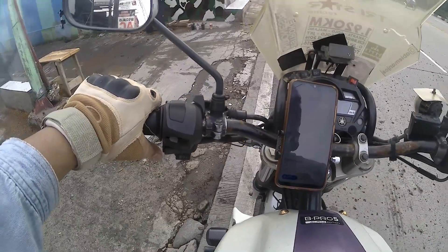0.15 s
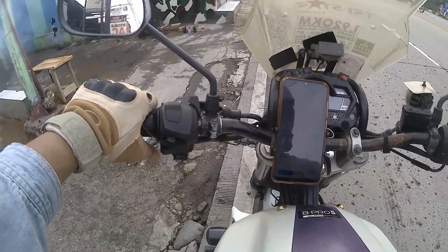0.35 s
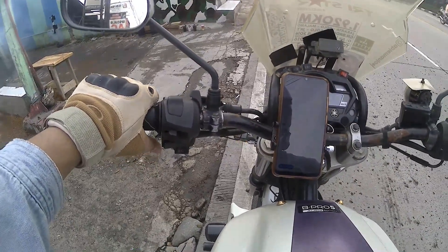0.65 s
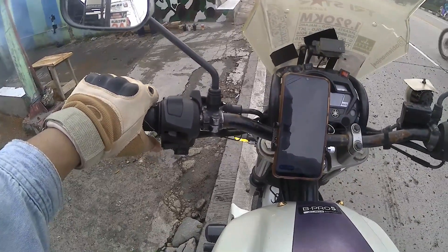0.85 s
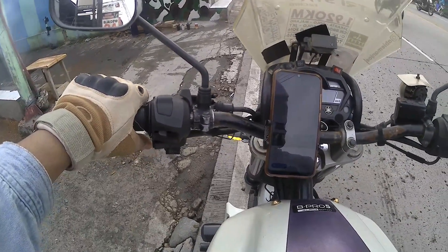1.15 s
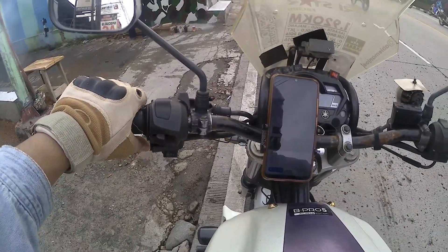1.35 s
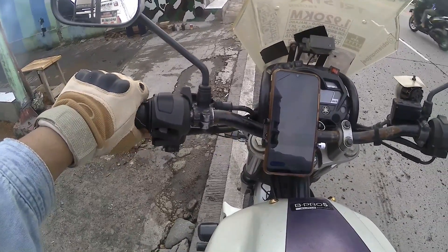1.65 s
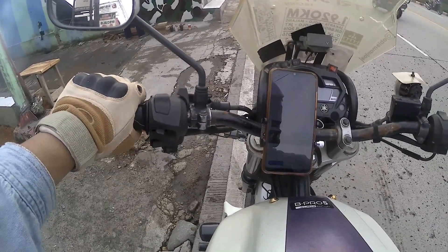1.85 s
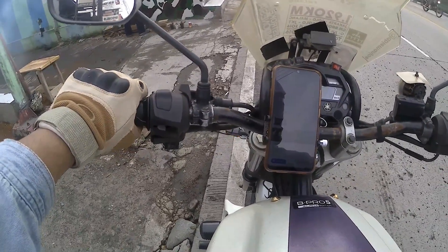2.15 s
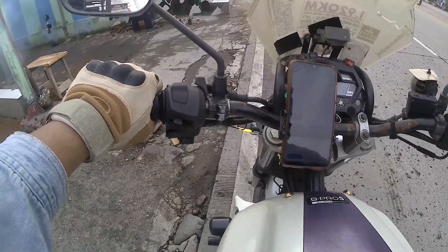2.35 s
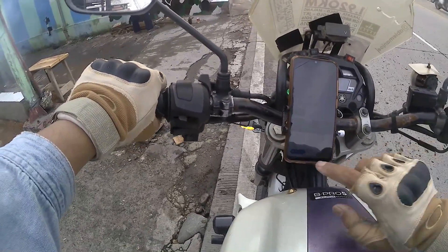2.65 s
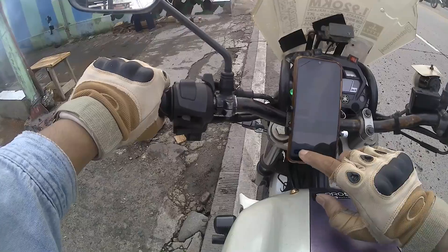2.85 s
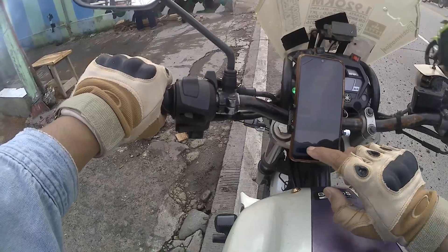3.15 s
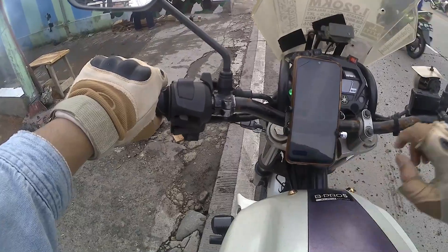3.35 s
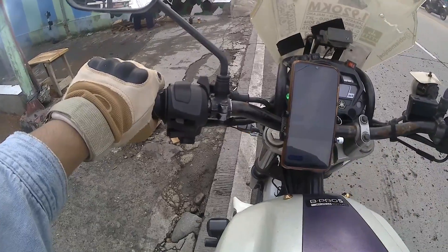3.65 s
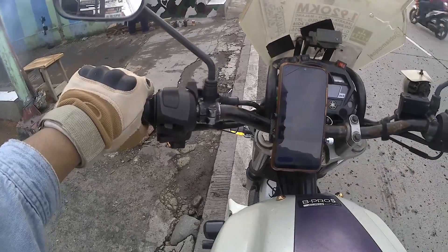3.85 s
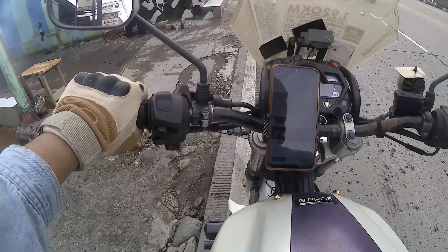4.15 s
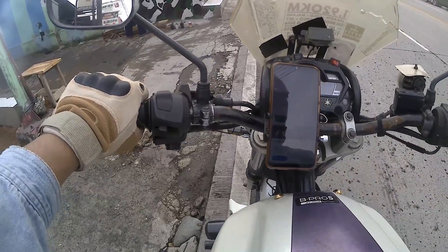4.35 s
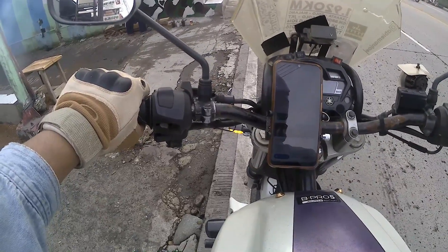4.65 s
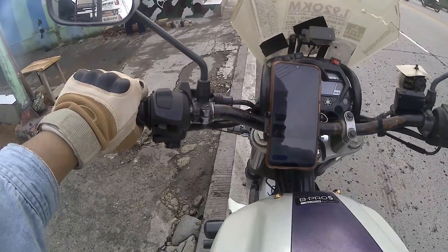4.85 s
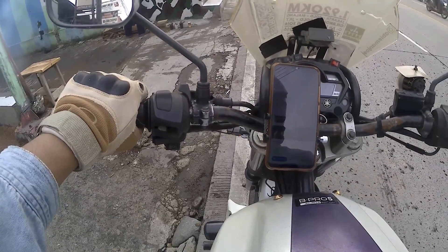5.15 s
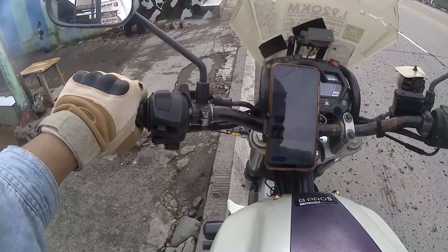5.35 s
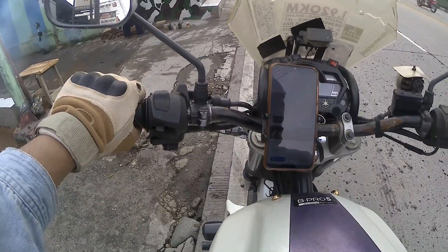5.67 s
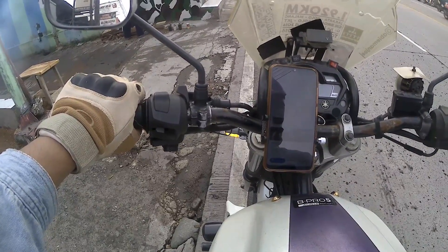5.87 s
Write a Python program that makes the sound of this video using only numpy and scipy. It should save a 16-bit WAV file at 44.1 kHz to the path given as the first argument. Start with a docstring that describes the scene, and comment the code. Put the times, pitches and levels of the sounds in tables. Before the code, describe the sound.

Heard from the seat, a stationary motorcycle idles and revs a couple of times as other motorbikes go by over tyre hiss and rumble.

```python
"""A single-cylinder motorcycle thumps and clatters at the roadside, right under a microphone at the
rider's seat. Twice the throttle opens and the airbox honks; the revs rise again at the end.
Out in the street, over tyre hiss and rumble, three bikes pass: one gathers speed with a hard putter,
one cruises with a steady boom, and a later one whines by and coasts off, its exhaust orders sinking.
The microphone feeds a narrow-band 8 kHz link."""
import sys
import numpy as np
from scipy import signal
from scipy.io import wavfile
from scipy.ndimage import map_coordinates

SR = 44100
rng = np.random.default_rng(int(sys.argv[2]) if len(sys.argv) > 2 else 0)


def log_audio(samples):
    """Write samples as a 16-bit WAV file to the path given in sys.argv[1]."""
    # one column per channel
    frames = np.atleast_2d(samples).T
    # limit to full scale, then quantise
    limited = np.clip(frames, -1, 1)
    pcm = np.round(limited * 32767).astype(np.int16)
    wavfile.write(sys.argv[1], SR, pcm)


N = 264996
TIME = np.arange(N) / SR
LINK_HZ = 8000

# street rumble: (frequency [Hz], relative level [dB])
RUMBLE_SPECTRUM = [(15, -36), (28, -17.5), (45, 6), (70, 3), (120, 3.5), (200, -2.5), (350, -10),
                   (700, -24.5), (2000, -40.5)]
# tyres on the road: (frequency [Hz], relative level [dB])
TYRE_SPECTRUM = [(200, 3), (450, 3), (700, -2.5), (950, -3), (1400, -10.5), (1900, -11.5), (2600, -17.5),
                 (3300, -22), (3900, -23)]
# brief flares of the hiss: (time [s], relative level [dB])
HISS_FLARES = [(.22, -23.5), (.74, -28), (2.14, -23.5), (2.62, -33)]

# an exhaust barking under load: (frequency [Hz], relative level [dB])
BARK_SPECTRUM = [(60, -25), (120, -1.5), (270, 2), (360, -4), (430, -8), (500, -4), (650, -5), (850, -12.5),
                 (1150, -17.5), (1600, -31), (2400, -46.5), (3600, -54.5)]
# the bark and its bounces off road and bodywork: (delay [s], relative level [dB])
BARK_PATHS = [(0, -1.5), (.0037, -14.5), (.0071, -23.5), (0.0118, -9)]
# engine speed of the pulling bike: (time [s], firing rate [1/s])
PULLING_SPEED = [(0, 22.7), (2, 27.74), (3, 28.5)]

# engine speed of the cruising bike: (time [s], firing rate [1/s])
CRUISING_SPEED = [(0, 45.2), (.25, 47), (.45, 47.7), (.7, 47.6), (1, 47.35), (1.4, 47.5), (2.5, 47.4)]
# its exhaust booming under load: (frequency [Hz], relative level [dB])
BOOM_SPECTRUM = [(25, -51), (48, -12), (95, -1), (143, -1.5), (190, -4.5), (238, -6.5), (300, -15),
                 (430, -16), (550, -35), (1000, -54), (3000, -75)]
# its tailpipe from behind: (frequency [Hz], relative level [dB])
TAILPIPE_SPECTRUM = [(100, -14), (150, -7), (190, 4.5), (238, 1), (285, -3.5), (335, -5.5), (380, 1),
                     (428, 4), (475, -1.5), (525, -10.5), (700, -16), (1500, -35), (3500, -61)]

# engine speed of the coasting bike: (time [s], firing rate [1/s])
COASTING_SPEED = [(2.3, 51.5), (2.7, 52.9), (2.95, 54.7), (3.28, 56.4), (3.4, 53.4), (3.52, 49.4),
                  (3.58, 48.6), (3.68, 43.4), (3.87, 43.3), (4.05, 42.3), (4.28, 41.5), (4.42, 38.4),
                  (4.52, 37.2), (4.68, 38.3), (4.95, 37.8), (6, 38.5)]
# four resonances that pick out its orders, low to high: (time [s], frequency [Hz], peak level [dB])
PIPE_RESONANCE = [(2.4, 160, -42), (3.27, 165, -36), (3.4, 160, -20), (3.55, 193, -23), (3.68, 172, -29),
                  (3.88, 173, -25), (4.25, 166, -27), (4.42, 154, -19), (4.54, 150, -17.5),
                  (4.63, 152, -12), (4.8, 152, -29), (5.05, 152, -21), (5.2, 152, -36), (6, 152, -44)]
GROWL_RESONANCE = [(2.3, 465, -41), (2.85, 485, -31), (3.05, 440, -29), (3.25, 395, -25.5), (3.4, 373, -28),
                   (3.54, 343, -26), (3.68, 310, -55)]
SNARL_RESONANCE = [(2.6, 540, -55), (3, 548, -35), (3.25, 505, -28), (3.45, 480, -38), (3.72, 433, -31),
                   (3.87, 390, -27), (4.03, 347, -30.5), (4.26, 336, -30), (4.5, 310, -44), (6, 305, -60)]
BUZZ_RESONANCE = [(3.2, 610, -65), (3.38, 590, -36), (3.53, 543, -30), (3.63, 510, -38), (3.74, 477, -31),
                  (3.92, 470, -65)]
# gas rasping in its muffler: (frequency [Hz], relative level [dB])
MUFFLER_SPECTRUM = [(50, -19.5), (120, -11), (210, 2.5), (290, -3), (390, 1.5), (510, -7.5), (650, -19.5),
                    (900, -17.5), (1400, -34), (3500, -37)]
# its high orders, singing while it pulls: (frequency [Hz], relative level [dB])
SINGING_SPECTRUM = [(700, -27), (810, -7), (890, 0.5), (970, -9), (1045, -11), (1110, -10.5), (1180, -11.5),
                    (1265, -7.5), (1400, -28)]
# its thin whine, which climbs and twice steps back down: (time [s], frequency [Hz])
WHINE_PITCH = [(2.1, 1021), (2.4, 1034), (2.7, 1059), (2.73, 1018), (2.81, 1018), (2.95, 1041),
               (3.05, 1043), (3.08, 996), (3.25, 1012), (3.55, 1009)]
# brief spurts of that whine: (time [s], level [dB])
WHINE_SPURTS = [(2.04, -37.5), (2.27, -38), (2.79, -29), (2.89, -40), (3.24, -35.5), (3.34, -40),
                (3.5, -40)]

# engine speed of the rider's own bike: (time [s], firing rate [1/s])
OWN_SPEED = [(0, 9.28), (0.28, 10.03), (.72, 15.64), (.95, 15.99), (1.39, 9.44), (2.02, 24.58),
             (2.33, 23.41), (2.98, 13.92), (3.65, 8.64), (4.8, 9.93), (5.68, 12.41), (6.01, 17.74)]
# weight of its exhaust: (time [s], relative level [dB])
THUMP_LEVEL = [(.45, 1.5), (1.25, -2), (1.6, 0), (2.15, -11), (2.28, 1), (2.9, -6.5), (4.4, -2),
               (5.4, -2.7), (5.9, 2.2)]
# its exhaust ringing on at high revs: (frequency [Hz], relative level [dB])
RING_SPECTRUM = [(50, -30.5), (78, -7.5), (94, -3.5), (108, -4.5), (150, -21), (300, -56)]
# its throttle held open: (opening time [s], shutting time [s], honk level over idle [dB])
THROTTLE_OPENINGS = [(.62, 1.006, 11.5), (1.457, 2.085, 12.5)]
# one gulp through its airbox: (frequency [Hz], relative level [dB])
AIRBOX_SPECTRUM = [(60, -20), (95, -12.5), (122, 25.5), (150, 10.5), (220, -25.5), (500, -35)]
# its valve gear clattering: (frequency [Hz], relative level [dB])
CLATTER_SPECTRUM = [(80, -35.5), (170, 15.5), (300, -3), (440, 2.5), (700, -20.5), (1000, -9), (1500, -19),
                    (2200, -25.5), (3500, -38.5)]


def amp(db):
    """Decibels to gain."""
    return 10 ** (np.asarray(db) / 20)


def curves(rows):
    """Each column of a table, joined by straight lines over time."""
    times, *columns = np.transpose(rows)
    return [np.interp(TIME, times, column) for column in columns]


def gain_at(spectrum, hz):
    """The gain of a spectrum at these frequencies."""
    points, db = np.transpose(spectrum)
    return amp(np.interp(np.log(hz + 1), np.log(points), db))


def colour(x, spectrum, size=8192):
    """Rings x through a causal filter of unit energy with this spectrum, cut to the link's band."""
    hz = abs(np.fft.fftfreq(size, 1 / SR))
    gain = gain_at(spectrum, hz) / (1 + (2 * hz / LINK_HZ) ** 20)
    minimum_phase = np.exp(np.conj(signal.hilbert(np.log(gain + 1e-9))))
    ring = np.fft.ifft(minimum_phase).real[:size // 2]
    return signal.oaconvolve(x, ring / np.linalg.norm(ring))[:N]


def wander(per_s):
    """A smooth random drift of rms 1."""
    knots = rng.standard_normal(2000)
    drift = np.interp(TIME * per_s, np.arange(len(knots)), knots)
    return drift / np.sqrt(np.mean(drift ** 2))


def wavering_phase(hz, depth, per_s):
    """Phase in radians of a frequency that wavers by the fraction depth."""
    return 2 * np.pi * np.cumsum(hz * (1 + depth * wander(per_s))) / SR


def swell(at_s, width_s):
    """A bell-shaped rise from 0 to 1 and back."""
    return np.exp(-((TIME - at_s) / width_s) ** 2)


def passing(nearest_s, span_s):
    """Gain on driving past the microphone: one over distance, 3 dB down span_s from the nearest point."""
    return 1 / np.hypot(1, (TIME - nearest_s) / span_s)


def leaving(from_s, db_per_s):
    """Gain of a vehicle dropping out of earshot down the street."""
    return amp(-db_per_s * np.maximum(TIME - from_s, 0))


def strokes(rate, angle, spread_db):
    """One kick of uneven size each time the engine cycle passes this angle (in cycles)."""
    cycle = np.floor(np.cumsum(rate) / SR - angle)
    strength = amp(spread_db * np.clip(rng.standard_normal(N), -2, 2))
    return np.diff(cycle, prepend=cycle[0]) * strength * np.sqrt(SR)


def puffs(kicks, decay_s):
    """Each kick lets off a dying burst of turbulence of the same energy."""
    keep = np.exp(-2 / (decay_s * SR))
    energy = signal.lfilter([1 - keep], [1, -keep], kicks ** 2)
    return np.sqrt(energy) * rng.standard_normal(N)


def road():
    """All around: tyre hiss swells with the traffic and flares; rumble grows as the last bike goes by."""
    tyres = [amp(-32),
             amp(-26.5) * passing(nearest_s=.52, span_s=.43),
             amp(-28.5) * passing(nearest_s=3.27, span_s=.86)]
    rise_s, fade_s = .038, .096
    flares = [amp(db) * np.interp(TIME - s, [0, rise_s], [0, 1]) * np.exp(-abs(TIME - s) / fade_s)
              for s, db in HISS_FLARES]
    level = np.sqrt(sum(gain ** 2 for gain in tyres + flares))
    hiss = colour(rng.standard_normal(N), TYRE_SPECTRUM) * level * amp(.55 * wander(per_s=20))
    rumble = colour(rng.standard_normal(N), RUMBLE_SPECTRUM)
    rumble_db = -29.3 + 3.3 * swell(at_s=3.7, width_s=1.2) + wander(per_s=6)
    return hiss + rumble * amp(rumble_db)


def street_echo(x, wet_db, t60_s, count=60):
    """Walls and road throw a scatter of dying echoes back to the microphone."""
    delay_s = rng.uniform(.0059, .18, count)
    taps = np.zeros(SR)
    taps[(delay_s * SR).astype(int)] = rng.choice([-1, 1], count) * amp(-60 * delay_s / t60_s)
    return x + amp(wet_db) * signal.oaconvolve(x, taps / np.linalg.norm(taps))[:N]


def bark(kicks):
    """Hard exhaust pulses with their bounces and a short rasp of gas."""
    bounced = sum(amp(db) * np.pad(kicks, (round(s * SR), 0))[:N] for s, db in BARK_PATHS)
    rasp = .6 * puffs(kicks, decay_s=.007)
    return colour(bounced + rasp, BARK_SPECTRUM)


def pulling_bike():
    """Out in the street, gathering speed: every firing is a separate bark, a few early ones harder."""
    rate, = curves(PULLING_SPEED)
    firing = strokes(rate, angle=.17, spread_db=.8)
    level = amp(-39 + 2.5 * swell(at_s=.28, width_s=.09))
    return bark(firing) * level * passing(nearest_s=.75, span_s=.89) * leaving(from_s=1.3, db_per_s=8.5)


def cruising_bike(firing_angle=.38):
    """Steady firings merge into a boom over a drone; it barks up close, then its tailpipe rings."""
    rate, = curves(CRUISING_SPEED)
    firing = strokes(rate, angle=firing_angle + .007 * wander(per_s=47), spread_db=1.1)
    surge_db = 4 * swell(at_s=.655, width_s=.035) + .8 * wander(per_s=12)
    boom = colour(firing, BOOM_SPECTRUM) * amp(-34.3 + surge_db)
    boom *= passing(nearest_s=.7, span_s=.45) * leaving(from_s=1.5, db_per_s=2)
    cycles = np.cumsum(rate) / SR - firing_angle
    drone = np.sin(4 * np.pi * cycles) * amp(-30.5 + 3.5 * wander(per_s=22))  # second order
    drone *= passing(nearest_s=.38, span_s=.35) * leaving(from_s=1.2, db_per_s=10)
    close_bark = bark(firing) * amp(-36) * passing(nearest_s=.52, span_s=.14)
    gas = firing + .4 * puffs(firing, decay_s=.0043)
    tailpipe = colour(gas, TAILPIPE_SPECTRUM) * amp(-42) * passing(nearest_s=1.7, span_s=.43)
    return (drone - boom - close_bark - tailpipe) * leaving(from_s=2.4, db_per_s=15)


def coasting_bike(half_width_hz=20):
    """Its orders sink as it passes and shuts off; each sings out while it meets a resonance."""
    rate, = curves(COASTING_SPEED)
    resonances = [curves(rows)
                  for rows in (PIPE_RESONANCE, GROWL_RESONANCE, SNARL_RESONANCE, BUZZ_RESONANCE)]
    phase = wavering_phase(rate, depth=.008, per_s=50)
    near = passing(nearest_s=3.5, span_s=.22)
    exhaust = 0
    for order in range(3, 14):
        resonant = [amp(db) / (1 + ((order * rate - hz) / half_width_hz) ** 2) for hz, db in resonances]
        plain = amp(-21) * near / order
        level = np.sqrt(plain ** 2 + sum(gain ** 2 for gain in resonant)) * amp(2.2 * wander(per_s=55))
        exhaust += level * np.sin(order * (phase + order))  # the pipe delays each order differently
    gas = puffs(strokes(rate, angle=0, spread_db=1), decay_s=.006) / np.sqrt(rate)
    return exhaust + colour(gas, MUFFLER_SPECTRUM) * amp(-29) * near


def whine():
    """The coasting bike approaching: high orders climb until it shuts off, beside a thin, shaky tone."""
    rate, = curves(COASTING_SPEED)
    phase = wavering_phase(rate, depth=.002, per_s=40)
    singing = 0
    for order in range(14, 26):
        level = gain_at(SINGING_SPECTRUM, order * rate) * amp(-35.5 + 2.5 * wander(per_s=25))
        singing += level * np.sin(order * (phase + order))
    singing *= passing(nearest_s=2.88, span_s=.4) * leaving(from_s=3.08, db_per_s=35)
    hz, = curves(WHINE_PITCH)
    tone = np.sin(wavering_phase(hz, depth=.0045, per_s=70))
    spurts = sum(amp(db) * swell(at_s=s, width_s=.05) for s, db in WHINE_SPURTS)
    tone_level = amp(-39) * swell(at_s=2.7, width_s=.65) + spurts
    return singing + tone * tone_level * amp(1.5 * wander(per_s=80))


def silencer(kicks, centre_hz, lag_s, size=1500):
    """The silencer rounds each kick into one smooth swing of pressure."""
    t = np.arange(-size, size + 1) / SR - lag_s
    u = (np.pi * centre_hz * t) ** 2
    swing = (2 * u - 1) * np.exp(-u)
    return signal.oaconvolve(kicks, swing / np.linalg.norm(swing), "same")


def airbox_honk(gas, ease_s=.051):
    """Each gulp of air rings the airbox, louder while the throttle is open."""
    open_db = sum(db * (np.tanh((TIME - opens) / ease_s) - np.tanh((TIME - shuts) / ease_s)) / 2
                  for opens, shuts, db in THROTTLE_OPENINGS)
    return colour(gas, AIRBOX_SPECTRUM) * amp(open_db - 47)


def valve_clatter(rate, firing):
    """The valve gear rattles at each firing and twice more in the cycle."""
    valves = strokes(rate, angle=.68, spread_db=5) + strokes(rate, angle=.93, spread_db=6)
    rattle = amp(-46.5) * puffs(firing, decay_s=.017) + amp(-49) * puffs(valves, decay_s=.019)
    return colour(rattle, CLATTER_SPECTRUM)


def own_engine(idle_rate=10, ring_db_per_octave=6, clatter_db_per_octave=1):
    """Right under the microphone: a soft thump per firing that rings at high revs, airbox and valves."""
    rate, = curves(OWN_SPEED)
    thump_db, = curves(THUMP_LEVEL)
    octaves = np.log2(rate / idle_rate)
    firing = strokes(rate, angle=.3, spread_db=.9)
    gas = firing + .18 * puffs(firing, decay_s=.015)
    thump = silencer(gas, centre_hz=79, lag_s=.00898) * amp(thump_db - 36)
    ring = colour(gas, RING_SPECTRUM) * amp(thump_db - 47 + ring_db_per_octave * octaves)
    clatter = valve_clatter(rate, firing) * amp(clatter_db_per_octave * octaves)
    return thump + ring + airbox_honk(gas) + clatter


def scene():
    """From the seat: the rider's own engine close and dry, the traffic echoing out in the street."""
    traffic = street_echo(pulling_bike() + cruising_bike() + coasting_bike(), wet_db=-14.5, t60_s=.4)
    return (own_engine() + traffic + whine() + road())[None]


def record(dry, low_cut_hz=26.7, ceiling=.92, band_hz=3750, top_hz=15800):
    """One microphone loses the lowest bass and rounds off peaks, then feeds the narrow-band link."""
    low_cut = signal.butter(2, low_cut_hz, "highpass", fs=SR, output="sos")
    heard = signal.sosfiltfilt(low_cut, dry[0])
    rounded = heard / (1 + (heard / ceiling) ** 8) ** (1 / 8)
    narrow = signal.oaconvolve(rounded, signal.firwin(201, band_hz, fs=SR), "same")
    ticks = np.arange(0, N / SR, 1 / LINK_HZ)
    samples = map_coordinates(narrow, [ticks * SR], order=3, mode="nearest")
    joined = np.interp(TIME, ticks, samples)  # straight lines mirror faint copies into the treble
    top_cut = signal.firwin(511, top_hz, window=("kaiser", 9), fs=SR)
    return signal.oaconvolve(joined, top_cut, "same")[None]


dry = scene()
out = record(dry)
log_audio(out)
```